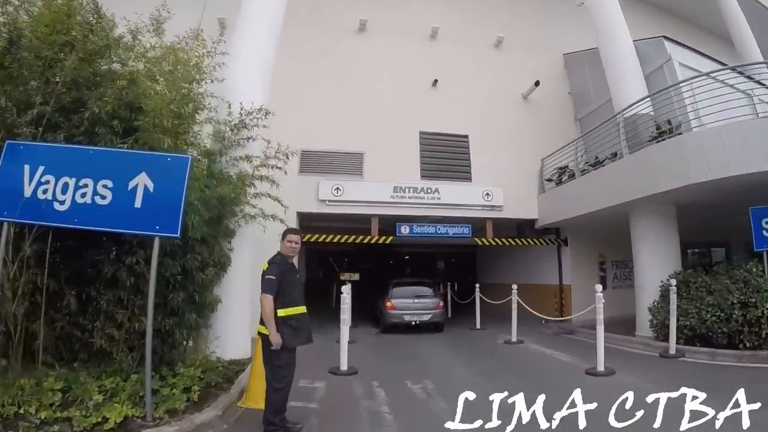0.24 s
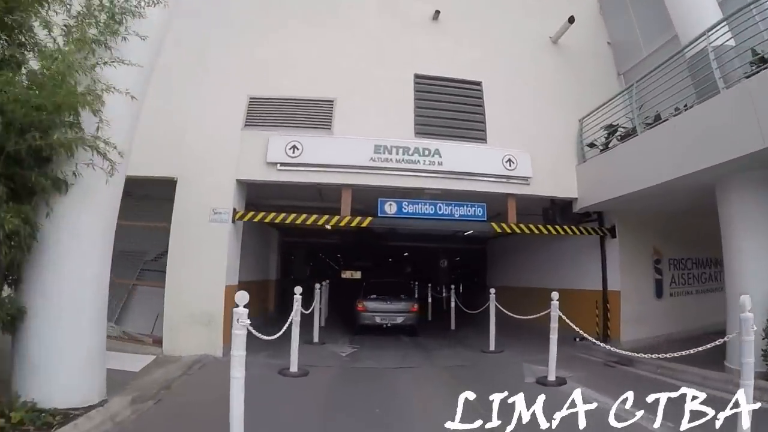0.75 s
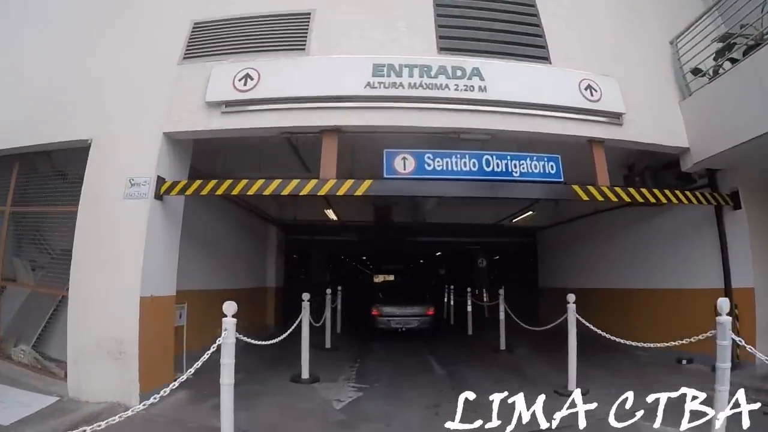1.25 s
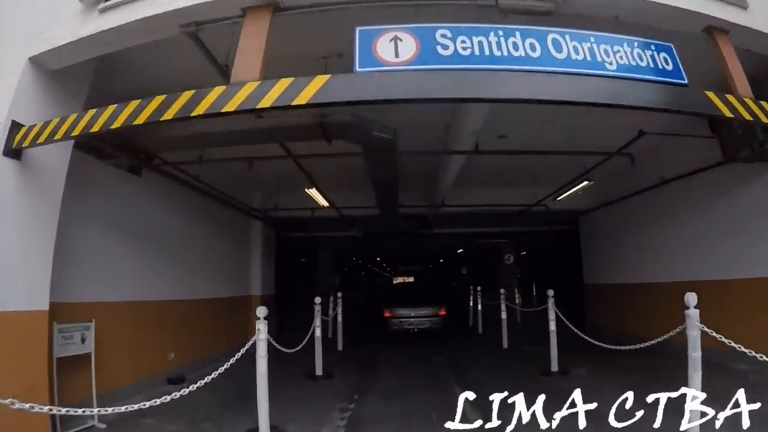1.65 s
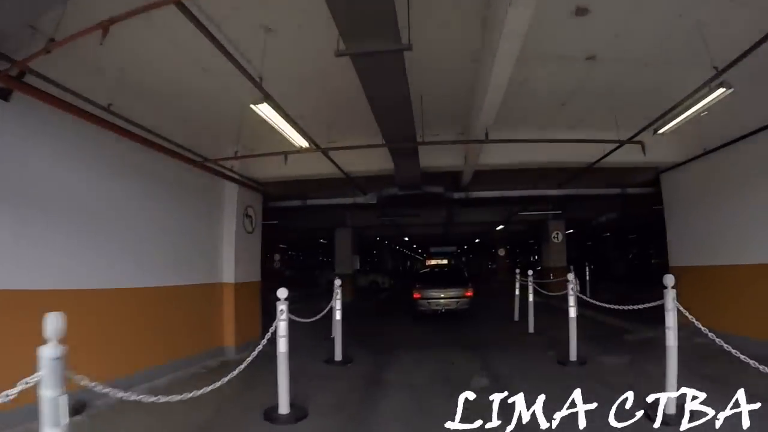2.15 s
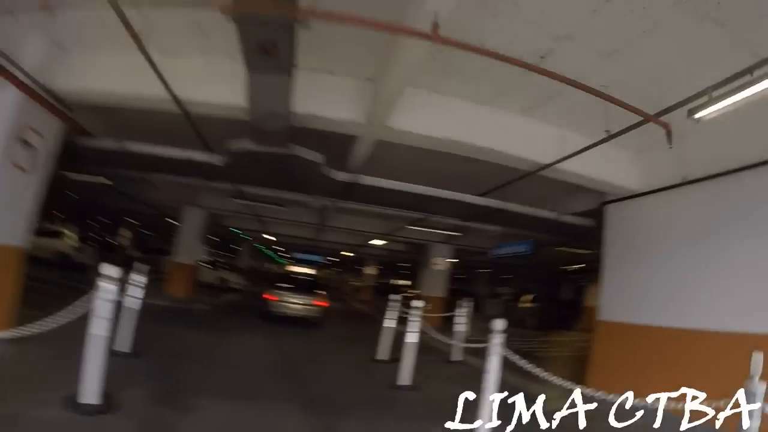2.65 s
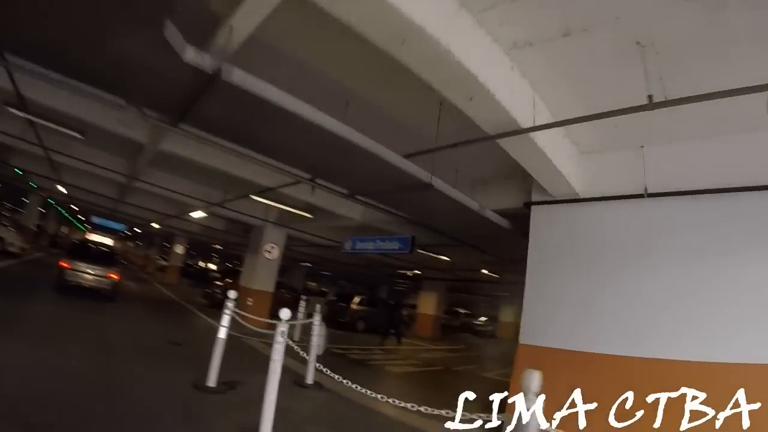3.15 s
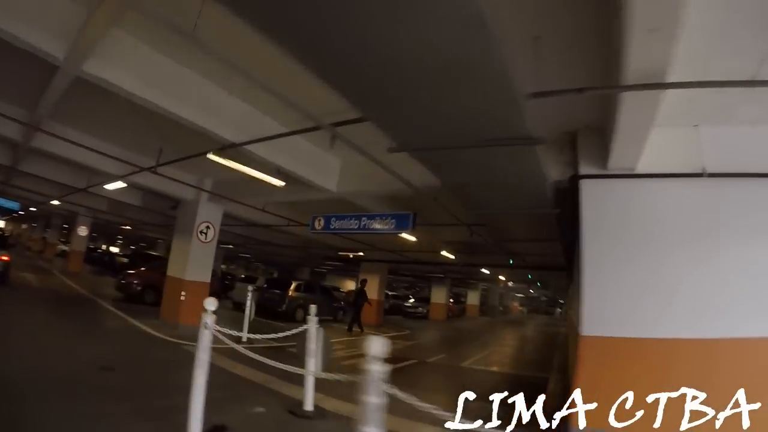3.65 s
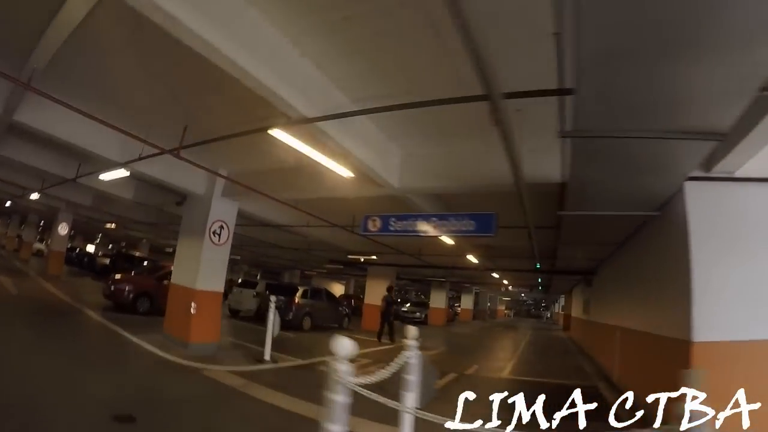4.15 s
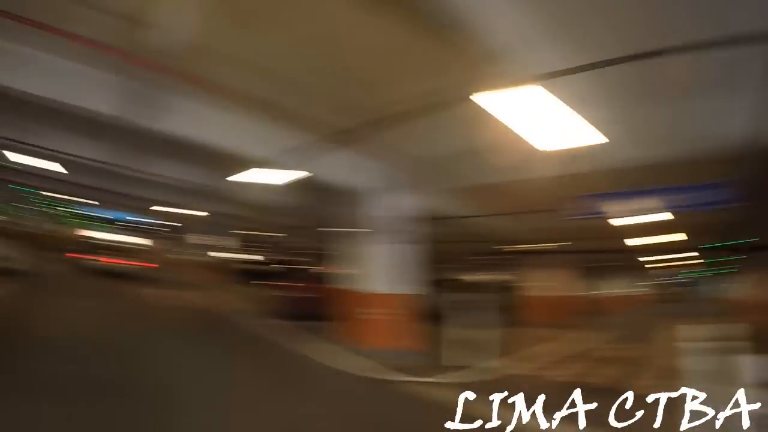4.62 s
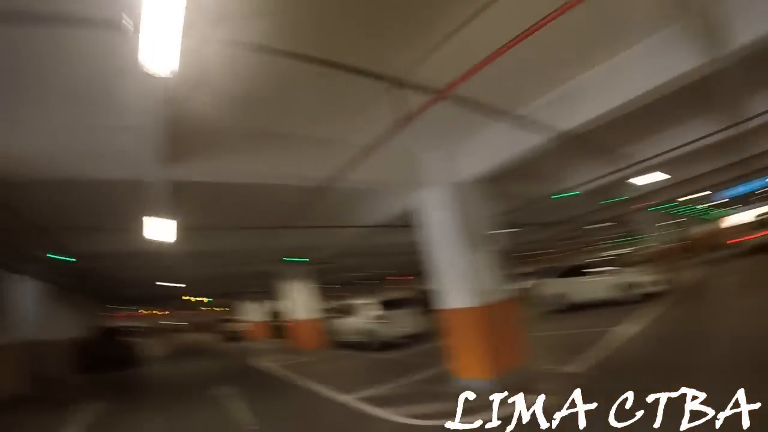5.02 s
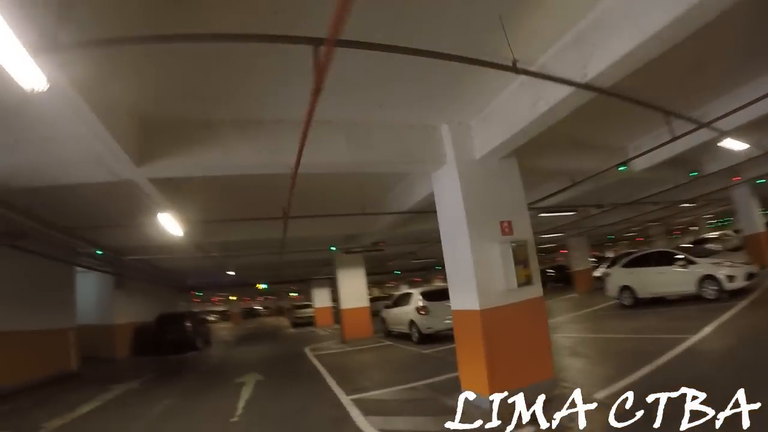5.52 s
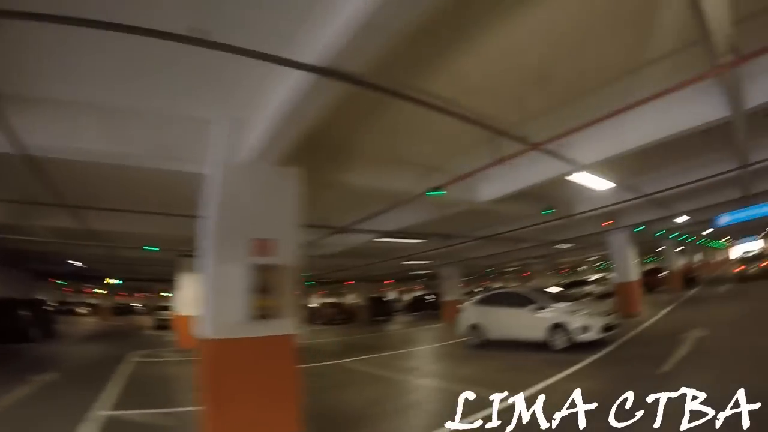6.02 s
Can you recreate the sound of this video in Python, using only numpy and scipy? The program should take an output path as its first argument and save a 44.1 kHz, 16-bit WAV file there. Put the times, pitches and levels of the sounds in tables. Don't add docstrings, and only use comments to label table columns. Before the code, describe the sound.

Close motorcycle engine putters and whines down as it enters a covered car park, coasts quietly, gives a short throttle bark, and drops to a lumpy idle.

```python
import sys
import numpy as np
from scipy import signal
from scipy.fft import rfft, irfft
from scipy.io import wavfile
from scipy.ndimage import uniform_filter1d

SR = 44100
rng = np.random.default_rng(int(sys.argv[2]) if len(sys.argv) > 2 else 0)


def boost_factor(decibels):
    exponent = np.asarray(decibels, float) / 20
    return 10 ** exponent


def wav_out(sig):
    wavfile.write(sys.argv[1], SR, np.round(np.clip(np.atleast_2d(sig).T, -1, 1) * 32767).astype(np.int16))


N = 276727
TIME = np.arange(N) / SR

# (time [s], firing rate [Hz], exhaust level [dB], intake hiss [dB])
ENGINE = [(0, 58.13, -26, -51), (.4, 52.5, -18.5, -53), (1.2, 47.1, -20, -54.5), (1.6, 44.52, -19.5, -54),
          (1.74, 40.84, -18.5, -55), (1.9, 42.7, -21, -55.5), (2.14, 39.76, -19, -52.5),
          (2.82, 40.14, -18.5, -53), (2.97, 37.41, -19, -54), (3.45, 38.7, -17.5, -58.5),
          (3.85, 37.42, -20, -64), (4.12, 39.05, -21.5, -63.5), (4.52, 37.9, -21, -61.5),
          (4.78, 47.48, -12.5, -53), (4.92, 50.94, -12.5, -52), (5.55, 37.74, -17.5, -54.5),
          (5.85, 33.15, -16, -54.5), (6.27, 36.5, -18, -51.5)]
# (start [s], length [s], strength [dB])
BURNS = [(0, 0.034, 6.5), (0.099, 0.087, 3.5), (0.257, 0.082, 3), (0.438, 0.071, -0.5), (0.564, 0.076, 0.5),
         (0.693, 0.061, -3), (0.791, 0.11, -3), (0.951, .07, -1.5), (1.07, 0.041, -1), (1.174, 0.059, 2.5),
         (1.301, 0.055, 6.5), (1.429, 0.085, 0), (1.56, .065, 2.5), (1.65, 0.029, -1), (1.707, 0.2, 0),
         (1.872, 0.098, -3), (2.008, 0.072, 1), (2.137, 9, 1)]
LIGHT_S, DIE_S, MISFIRE_DB = 0.012, 0.02, -20
SURGE_SHARE, SURGE_HZ, SURGE_S = 0.08, 48, 0.045

# (time [s], level [dB])
DRONE = [(0, -18), (.07, -16), (1, -28), (1.8, -25), (2.2, -34.5), (5, -27), (5.2, -41), (6.27, -43)]
# (frequency [Hz], level [dB])
MUFFLER = [(60, -13), (80, -4.5), (105, -1), (135, -0.5), (160, -4), (200, -20), (240, -26.5)]
# (frequency [Hz], level [dB])
PIPE = [(150, 4), (240, -2), (300, -9), (380, -9.5), (450, -17), (560, -12), (700, -26)]
DRONE_DUCK_DB, BARK_DB, BARK_SHARE = -4, -24.5, 1.48
# (time [s], frequency [Hz], half length
# [s], level [dB])
STANDING_WAVES = [(2.282, 120.2, 0.057, 6), (2.477, 122.5, 0.14, -7.5), (2.624, 158, 0.094, 7),
                  (2.717, 120.6, 0.12, 2.5), (2.936, 133, 0.11, -8), (3.105, 380, 0.046, 14),
                  (3.158, 117, .1, 1.5), (3.166, 154, 0.017, 6.5), (3.214, 246, 0.35, 5),
                  (3.338, 115, 0.024, -6), (3.44, 115, 0.074, 11), (3.455, 150, .09, -12.5),
                  (3.683, 74.63, .05, -5), (3.754, 113, 0.062, -8.5), (3.889, 154, 0.1, 8),
                  (3.965, 75.53, 0.21, 8.5), (3.993, 115, 0.06, -9), (4.25, 82, .06, 2),
                  (4.309, 114, 0.038, -4), (4.48, 115, .11, 11), (4.49, 145, 0.07, -7), (4.63, 402, .05, 15),
                  (4.865, 126.5, .03, -15), (4.941, 150.8, 0.017, 5.5), (5.187, 89.4, 0.13, 4),
                  (5.21, 132, 0.088, -5), (5.345, 106, 0.017, -24), (5.527, 113, 0.043, -8),
                  (5.589, 231, 0.053, 4), (5.69, 145, .04, -6.5),
                  (0.024, 121, 0.013, 10), (0.635, 296, .05, 5), (0.749, 209, 0.027, 8.5),
              (0.853, 299, 0.24, 11.5), (4.703, 226, 0.048, 3), (4.793, 188, 0.11, 8),
              (4.886, 301, 0.062, 1.5), (4.982, 255, 0.035, 5), (5.053, 94, 0.035, 0.5),
              (5.123, 351, 0.036, 1.5), (5.223, 235, .06, -4), (5.38, 249, 0.15, 3),
              (5.415, 127.6, 0.04, -3.5), (5.485, 160.5, 0.059, 3.5), (5.661, 112, .07, 3.5),
              (5.72, 197, .07, 2.5), (5.871, 132, 0.031, -1.5), (5.95, 68, 0.11, 2),
              (6.055, 136.1, 0.2, -2), (6.092, 106.7, 0.087, 0), (6.131, 181.8, .12, 0.5),
              (6.2, 248.4, 0.11, 7.5), (2, 199, 0.12, -6.5), (3, 200, 0.096, -5.5), (3.554, 195, .12, -6.5),
              (4.205, 150, .1, 5), (4.722, 278, 0.1, -8), (4.716, 139, 0.082, -7.5), (3.03, 110, .07, 5.5),
              (5.68, 150, .07, -4)]
WAVE_OCTAVES = 0.32

# (time [s], tooth rate [Hz], level [dB])
GEARS = [(0, 1884, -34.5), (.09, 1678, -28.5), (.4, 1602, -26), (1, 1495, -30), (1.42, 1365, -30),
         (1.61, 1408, -29), (1.74, 1269, -31.5), (1.9, 1343, -29.5), (2.1, 1246, -31.5), (2.8, 1229, -29),
         (3.09, 1178, -30), (4.52, 1208, -31), (4.8, 1520, -26.5), (4.94, 1579, -28), (5.12, 1383, -25.5),
         (5.46, 1305, -28), (5.82, 1058, -38.5), (6.27, 1163, -35.5)]
# (time [s], level [dB])
SECOND_PAIR = [(0, -20), (.6, -9), (1, -0.5), (1.6, -4), (2.5, -6.5), (3.2, -17), (4.6, -15.5), (5.2, -9.5),
               (6.3, -6.5)]
# (time [s], tooth rate [Hz], level [dB])
COASTING = [
    (0.0, 1520, -33.5),
    (0.038, 1460, -29),
    (0.058, 1380, -23),
    (0.075, 1380, -45),
]
# (frequency [Hz], level [dB])
COVER = [(2100, -39), (2450, -41), (2750, -43.5), (3050, -42.5), (3400, -50.5), (3700, -53), (4400, -50),
         (5000, -55.5)]
MESH_SHARE, UNLOAD_S, UNLOAD_DB = 0.53, 5.43, -6
IDLER, IDLER_DB, IDLER_TIGHT_S = 2.68, -45, 4.6

# (frequency [Hz], density [dB per Hz])
CASES = [(30, 12.5), (150, 5), (400, -8), (580, -2.5), (820, -10.5), (1150, -6), (1900, -17), (2700, -23),
         (3150, -31.5), (3900, -38), (5000, -36.5), (7000, -55), (12000, -73)]
# (frequency [Hz], density [dB per Hz])
INTAKE = [(2000, -22.5), (4000, 3), (5200, 1.5), (7000, -1), (8500, -9), (11000, -21), (14000, -39.5)]
# (frequency [Hz], density [dB per Hz])
JET = [(7000, -10.5), (10000, 1.5), (13500, -2.5), (15000, -6), (15600, -27)]
RATTLE_DB, RATTLE_SHARE = -29, 0.28
# (time [s], peak level [dB], ring [Hz])
TICKS = [
    (3.783, -52.5, 9950),
    (4.155, -47.5, 9906),
]

# (time [s], echo [dB], gear backlash [factor], burn roughness [0-1])
ROOM = [
    (0, -24, .85, .25),
    (1.6, -20, .9, .4),
    (2.4, -9, 1.2, .3),
    (3, -9, 1.25, .3),
    (4.5, -9, 1.25, .3),
    (4.9, -9, 1.1, .4),
    (5.5, -9, 1.1, .55),
    (6.3, -8, 2.3, .55),
]
# (frequency [Hz], decay to -60 dB [s])
GARAGE = [(100, 0.68), (1000, 1), (8000, 0.96)]
# (time [s], share [0-1])
WIND_CUT = [(4.55, 0.02), (4.75, .8), (5.4, 0.82), (5.75, .3), (6.27, 0.58)]


def evened(x):
    return x / np.sqrt(np.mean(x ** 2) + 1e-20)


def curves(rows):
    s, *columns = np.transpose(rows)
    return [np.interp(TIME, s, column) for column in columns]


def read(points, hz):
    f, value = np.transpose(points)
    return np.interp(np.log(hz + 1), np.log(f + 1), value)


def drift(hz):
    f = np.fft.rfftfreq(16384, 32 / SR)
    slow = irfft(rfft(rng.standard_normal(16384)) * np.exp(-(f / hz) ** 2))
    return np.interp(np.arange(N) / 32, np.arange(16384), evened(slow))


def complex_drift(hz):
    return drift(hz) + 1j * drift(hz)


def noise(points, patchy_db):
    frames, hz = N // 128 + 12, np.fft.rfftfreq(512, 1 / SR)
    a, b, patches = rng.standard_normal((frames, 257, 3)).T
    patches = uniform_filter1d(patches, size=5, axis=0)
    patches = evened(uniform_filter1d(patches, size=16, axis=1))
    z = (a + 1j * b) * boost_factor(read(points, hz)[:, None] + patchy_db * patches)
    return evened(signal.istft(z, nperseg=512, noverlap=384)[1][512:N + 512])


def burns():
    start, length, db = np.transpose(BURNS)[:, :, None]
    t = TIME[::32] - start
    light = np.clip(t / LIGHT_S + 1, 0, 1)
    die = np.exp(-np.maximum(t - length, 0) / DIE_S)
    strongest = (boost_factor(db) * light * die).max(axis=0)
    return np.interp(TIME, TIME[::32], np.maximum(strongest, boost_factor(MISFIRE_DB)))


def surge():
    size = round(SURGE_S * SR)
    push = uniform_filter1d(np.minimum(burns(), 2), size, origin=round(SURGE_S * SR / 4))
    swing = push - uniform_filter1d(push, size=12000)
    return 1 + SURGE_SHARE * (SURGE_HZ / curves(ENGINE)[0]) ** 3 * swing


def crank():
    hz = curves(ENGINE)[0] * surge() * (1 + 0.008 * drift(hz=9))
    turns = np.cumsum(hz) / SR
    return turns, rng.standard_normal(400)[turns.astype(int)]


def order_levels(hz, level_db):
    full = (TIME, hz, level_db, burns(), curves(DRONE)[0])
    t, hz, level_db, burn, drone_db = (c[::64] for c in full)
    burn_db = 20 * np.log10(burn)
    order_hz = np.arange(1, 17)[:, None] * hz
    drone = drone_db + DRONE_DUCK_DB * (np.minimum(burn, 1.5) - 0.5)
    low = level_db + burn_db + read(MUFFLER, order_hz[1:4])
    high = read(PIPE, order_hz[4:]) + burn_db / 2
    room = 0
    for s, f, half, db in STANDING_WAVES:
        room = room + db * np.exp(-((t - s) / half) ** 2 - (np.log2(order_hz / f) / WAVE_OCTAVES) ** 2)
    return [np.interp(TIME, t, row) for row in np.vstack([drone, low, high]) + room]


def exhaust(turns, burn):
    hz, level_db, _ = curves(ENGINE)
    levels = order_levels(hz, level_db)
    indoors = np.clip((TIME - 1.8) / 0.6, 0.1, 1)
    rough = curves(ROOM)[2]
    uneven = boost_factor(4 * rough * uniform_filter1d(burn, size=500))
    lag = 95 / hz

    def wave(k):
        return np.exp(1j * (2 * np.pi * k * turns - lag / k))

    thump = 0
    for k, db in enumerate(levels[:4], 1):
        scatter = np.exp(0.55j * indoors * drift(hz=3))
        scatter = scatter + rough * (indoors + 0.3) * complex_drift(14) / 2
        side = 1 if k == 1 else -1
        thump = thump + side * np.sqrt(2) * boost_factor(db) * (scatter * wave(k)).real
    bark = 0
    for k in range(5, 17):
        scatter = 0.6 + indoors * complex_drift(5) + 2.2 * rough * complex_drift(18)
        bark = bark - boost_factor(levels[k - 1]) * (scatter * wave(k)).real
    bark_db = BARK_DB + BARK_SHARE * (level_db + 17)
    return uneven * (thump + boost_factor(bark_db) * evened(bark))


def gears(turns):
    hz, whine_db = curves(GEARS)
    echo_db, backlash, _ = curves(ROOM)
    idler_db = IDLER_DB + echo_db - 20 * np.clip((TIME - IDLER_TIGHT_S) * 10, 0, 1)
    unload_db = UNLOAD_DB * np.clip((TIME - UNLOAD_S) / 0.3 + 1, 0, 1)
    load_db = MESH_SHARE * (curves(ENGINE)[2] + 55) + unload_db
    # (multiple of the tooth rate, level [dB])
    partials = [(1, whine_db)] + [(k, read(COVER, k * hz) + load_db) for k in (2, 3)]
    partials += [(1.075, whine_db + curves(SECOND_PAIR)[0]), (IDLER, idler_db)]
    ripple = 0.02 * np.sin(2 * np.pi * turns) + 0.011 * drift(hz=40) + 0.022 * drift(hz=150)
    teeth = np.cumsum(hz * surge() * (1 + backlash * ripple)) / SR
    out = 0
    for k, db in partials:
        contact = 1 + 0.35 * np.cos(2 * np.pi * turns + k) + 0.6 * backlash * complex_drift(60 + 45 * k)
        out = out + boost_factor(db) * evened((contact * np.exp(2j * np.pi * k * teeth)).real)
    return out + coasting()


def coasting():
    hz, db = curves(COASTING)
    fade = np.clip((COASTING[-1][0] - TIME) / 0.024, 0, 1)
    teeth = np.cumsum(hz * (1 + 0.012 * drift(hz=60))) / SR
    return np.sqrt(2) * boost_factor(db) * fade * np.sin(2 * np.pi * teeth)


def cases(turns, burn):
    hiss_db = curves(ENGINE)[2]
    rattle_db = RATTLE_DB + RATTLE_SHARE * (hiss_db + 57)
    beat = (0.5 + np.exp(-(turns % 1) / 0.4)) * boost_factor(4 * np.tanh(burn))
    beat = uniform_filter1d(beat, size=130)
    rattle = boost_factor(rattle_db + 7) * noise(CASES, patchy_db=0.68) * evened(1 + 0.3 * beat)
    hiss = boost_factor(hiss_db + 3.5) * noise(INTAKE, patchy_db=1)
    jet = boost_factor(0.37 * (hiss_db + 58) - 65) * noise(JET, patchy_db=2)
    return rattle + (hiss + jet) * evened(1 + 0.47 * beat)


def ticks():
    out, t = np.zeros(N), TIME[:600]
    for s, db, hz in TICKS:
        at = round(s * SR)
        ring = np.sin(2 * np.pi * hz * t) + 0.3 * np.sin(2 * np.pi * 1.48 * hz * t)
        ring = ring + 1.1 * rng.standard_normal(600)
        out[at:at + 600] += boost_factor(db - 3.5 - 60 * t / 0.035) * ring
    return out


def garage(x):
    taps = np.zeros(SR)
    at = np.arange(400, SR - 20, 20)
    taps[at + rng.integers(0, 20, len(at))] = rng.choice([-1., 1.], len(at))
    hz, t, z = signal.stft(taps, SR, nperseg=512)
    decay = boost_factor(-60 * t / read(GARAGE, hz)[:, None])
    tail = signal.istft(z * decay, SR, nperseg=512)[1]
    return signal.fftconvolve(x, tail / np.linalg.norm(tail))[:N]


def scene():
    turns, burn = crank()
    whine = gears(turns)
    echo = boost_factor(curves(ROOM)[0]) * garage(whine)
    return (exhaust(turns, burn) + whine + echo + cases(turns, burn) + ticks())[None]


def top_cut(x):
    return signal.sosfilt(signal.butter(12, 15160, fs=SR, output="sos"), x)


def record(dry):
    cut = signal.sosfilt(signal.butter(4, 41, "high", fs=SR, output="sos"), dry)
    bass = signal.sosfiltfilt(signal.butter(4, 75, fs=SR, output="sos"), cut)
    cut = cut - np.clip(curves(WIND_CUT)[0], 0, 1) * bass
    soft = 0.95 * np.tanh(cut / 0.9)
    edge = signal.firwin(255, 15250, window=("kaiser", 9), fs=SR)
    return top_cut(signal.oaconvolve(soft, edge[None], "same"))


dry = scene()
out = record(dry)
wav_out(out)
```